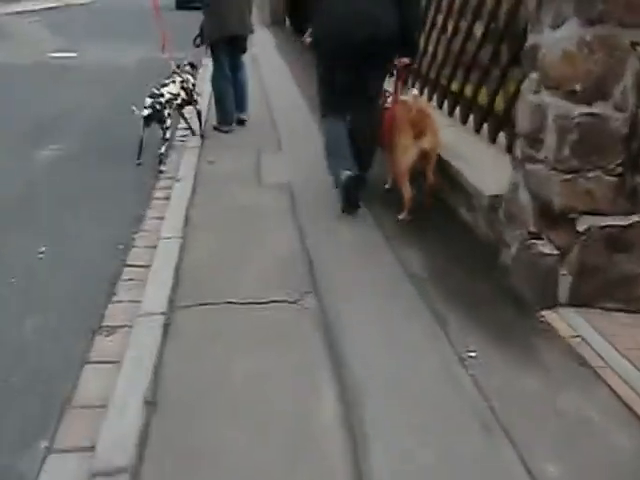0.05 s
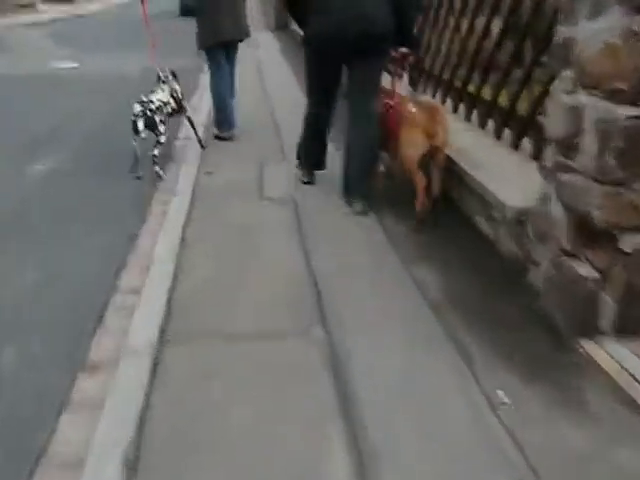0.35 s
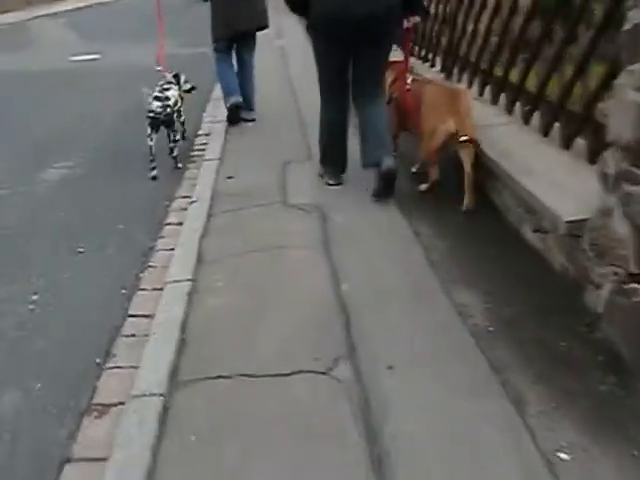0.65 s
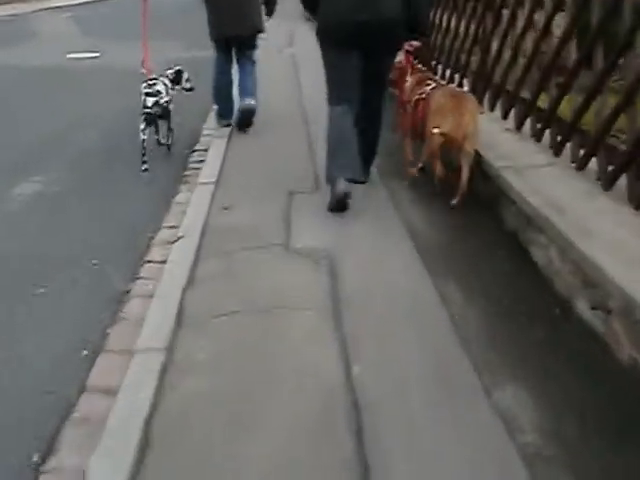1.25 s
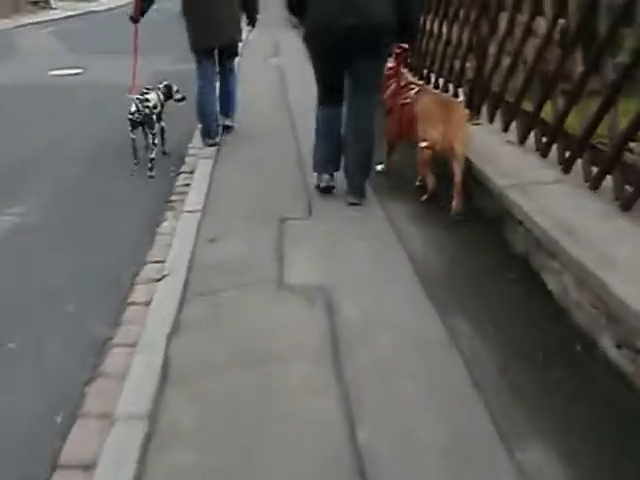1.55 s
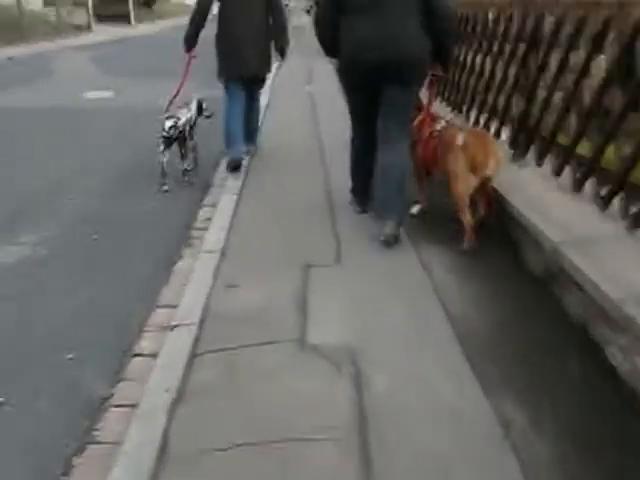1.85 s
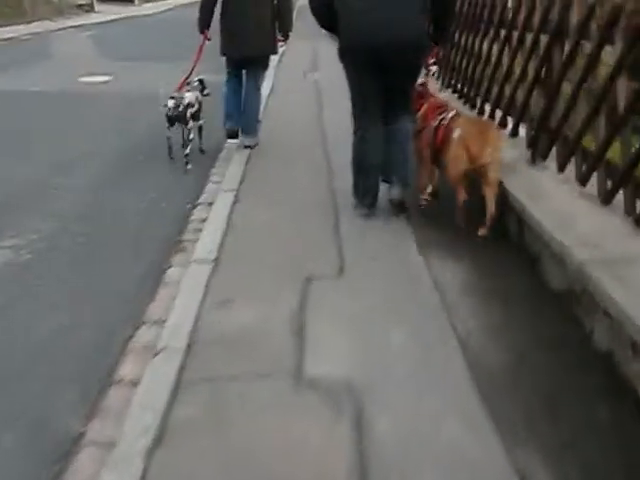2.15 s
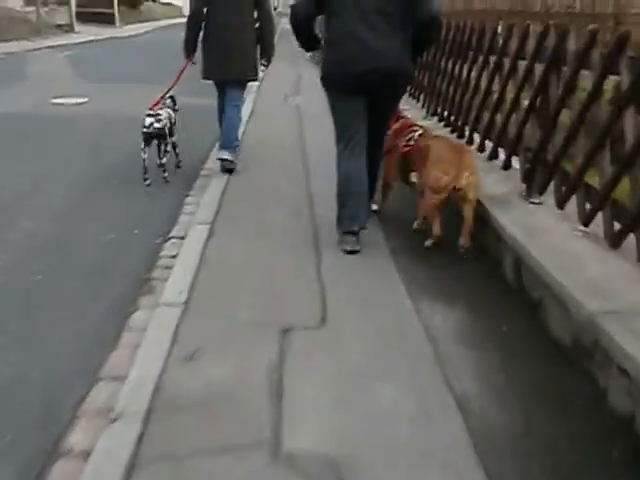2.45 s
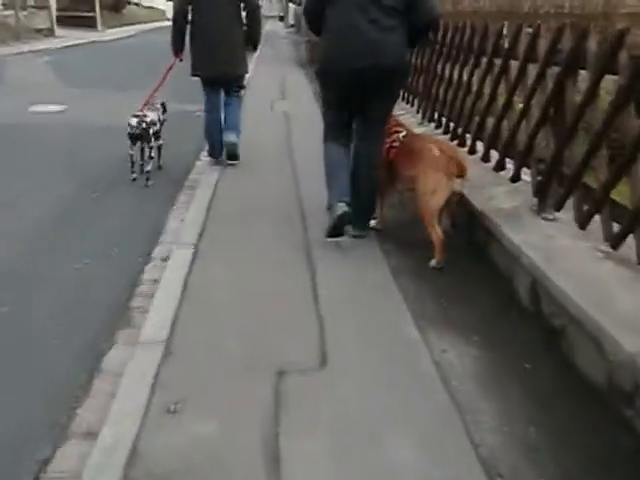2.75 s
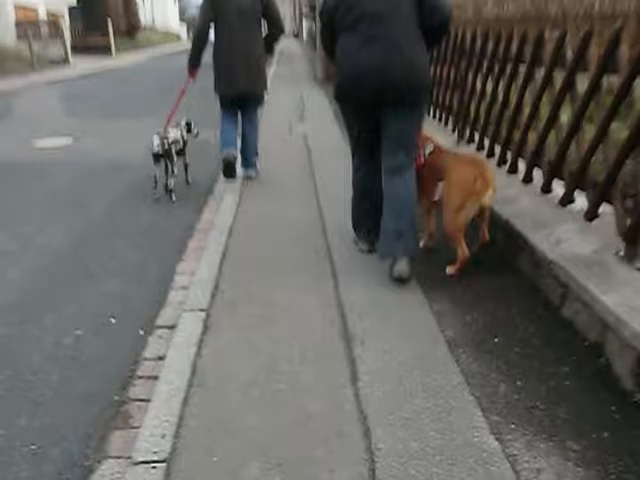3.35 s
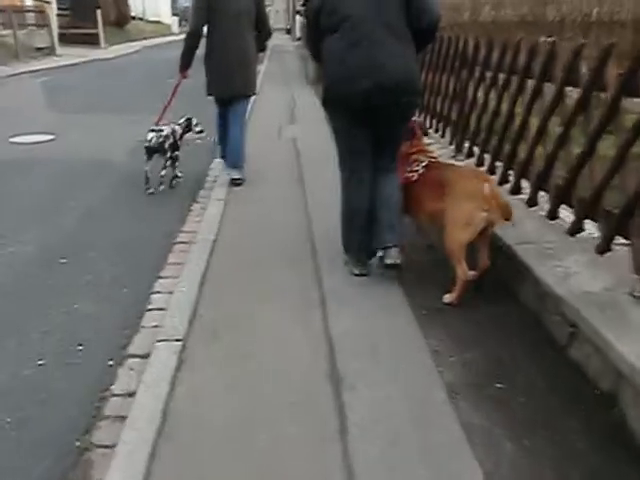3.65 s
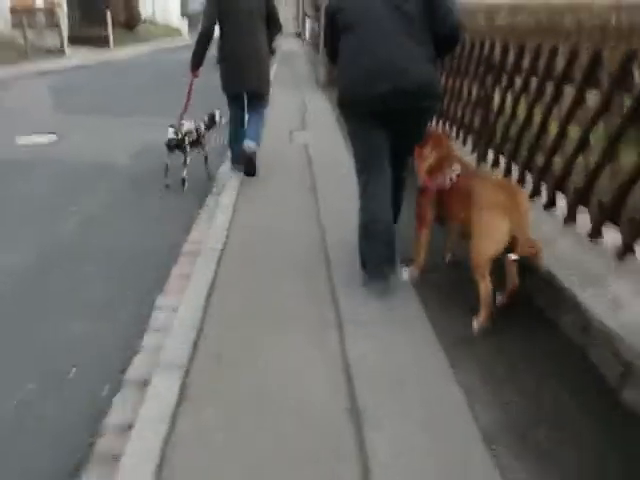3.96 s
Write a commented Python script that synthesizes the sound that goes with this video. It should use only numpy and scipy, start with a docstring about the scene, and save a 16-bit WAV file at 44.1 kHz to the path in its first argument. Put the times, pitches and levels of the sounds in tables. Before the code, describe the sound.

A dog-training clicker gives two sharp, close clicks in quick succession a little past halfway. Wind buffets the microphone before and after, while faint shoe scuffs, claw ticks and tag clinks sound over a soft street hiss.

```python
"""A dog-training clicker is pressed and let go close by, on a walk with dogs along a paved street.
Its steel tongue snaps over and back, each time with a crack and a short ring in a small plastic box.
Gusts buffet the microphone with little swirls of air. Shoes scuff, clothes swish, grit and claws tick
on the pavement and the dogs' tags clink, all over a faint street hiss."""
import sys
import numpy as np
from scipy import signal
from scipy.fft import rfft, irfft
from scipy.io import wavfile

SR = 44100
rng = np.random.default_rng(int(sys.argv[2]) if len(sys.argv) > 2 else 0)


def log_audio(samples):
    """Write samples as a 16-bit WAV file to the path given in sys.argv[1]."""
    # one column per channel
    frames = np.atleast_2d(samples).T
    # limit to full scale, then quantise
    limited = np.clip(frames, -1, 1)
    pcm = np.round(limited * 32767).astype(np.int16)
    wavfile.write(sys.argv[1], SR, pcm)


N = 176400
T = np.arange(N) / SR


def from_db(db):
    """Turn decibels into a number to multiply a sound by."""
    return 10 ** (np.asarray(db) / 20)


def noise(colour, size=N):
    """Noise of standard strength (rms 1); colour(Hz) says how strong each frequency is."""
    hz = np.maximum(np.fft.rfftfreq(size, 1 / SR), 1)
    x = irfft(rfft(rng.standard_normal(size)) * colour(hz), size)
    return x / np.std(x)


def through(points):
    """A noise colour that joins up points of frequency in Hz and level in dB."""
    at, db = np.transpose(points)
    return lambda hz: from_db(np.interp(np.log(hz), np.log(at), db))


def hump(centre_hz, octaves):
    """A noise colour with one peak; more octaves make it wider."""
    return lambda hz: (1 + .5 * (np.log2(hz / centre_hz) / octaves) ** 2) ** -2


def dying(fade_s):
    """Half a second of fading, down 60 dB every fade_s seconds."""
    return from_db(-60 * T[:SR // 2] / fade_s)


def swell(rise, fall):
    """One second with a bell-shaped peak in the middle."""
    t = T[:SR] - .5
    return np.exp(-.5 * (t / np.where(t < 0, rise, fall)) ** 2)


def add(out, start, x):
    """Mix x into out at a start time in seconds."""
    i = int(round(start * SR))
    x, i = x[max(-i, 0):], max(i, 0)
    out[i:i + len(x)] += x[:N - i]


def gust(peak_s, half_s, rate, count=25):
    """A run of swirls, each a lopsided bump of pressure; faster air makes them closer and sharper."""
    out, t = np.zeros(N), T[:SR // 10] - 1 / 20
    spacing_s, usual_width_s = 1.05 / rate, 0.21 / rate
    jitter, steepness, spread_db, spread_octaves = 0.2943, 1.93, 3, 0.44
    lead_db, lead_sharper = 1.5, 1.179
    places = np.arange(count) - count // 2
    for k, (late, size, sharp, skew) in zip(places, rng.standard_normal((count, 4))):
        lead = k == 0   # the swirl at the height of the gust
        offset = 0 if lead else (k + jitter * late) * spacing_s
        width = usual_width_s / (lead_sharper if lead else 2 ** (spread_octaves * sharp))
        gain = from_db(lead_db if lead else spread_db * (size - .5))
        gain *= np.exp(-.5 * (offset / half_s) ** 2)
        if gain > .02:
            spike = (1 - 1j * t / width) ** -steepness
            bump = np.real(np.exp(2j * skew) * spike) * np.hanning(len(t))   # skew tips it to one side
            even_out = np.sqrt(SR / rate / np.sum(bump ** 2))   # same energy whatever the width
            add(out, peak_s + offset + t[0], gain * bump * even_out)
    return out


def wind():
    """Gusts buffet the microphone over a low, swaying breeze; the hardest ones crackle."""
    # Each row: peak time in seconds, half length in seconds, relative level in dB, rough swirls a second.
    gusts = [(0.009, 0.0063, -8, 87), (0.023, 0.0047, -5, 157), (0.042, 0.012, -11, 178),
             (0.056, 0.042, -20.5, 78), (0.108, 0.0083, -10.5, 142), (0.139, 0.0048, -17, 187),
             (0.15, 0.015, -16, 147), (0.171, 0.0034, -8.5, 202), (0.199, 0.0073, -16.5, 193),
             (0.237, 0.038, -19.5, 98), (0.424, 0.013, -21.5, 125), (0.478, 0.0094, -17, 125),
             (0.521, 0.0053, -14.5, 138), (0.544, 0.038, -21, 145), (0.574, 0.0087, -15, 169),
             (0.606, 0.01, -12, 123), (0.629, 0.011, -15, 218), (0.648, 0.012, -18, 166),
             (0.666, 0.01, -16, 173), (0.689, 0.021, -18, 101), (0.767, 0.019, -22, 70),
             (0.827, 0.018, -18.5, 75.6), (0.882, 0.025, -19.5, 92.7), (1.033, 0.0061, -19, 48),
             (1.341, 0.046, -32.5, 50), (1.417, 0.011, -22.5, 75.5), (1.463, 0.018, -30, 43),
             (1.553, 0.009, -27.5, 55), (1.701, 0.014, -21.5, 134), (1.719, 0.023, -17, 96),
             (1.776, 0.0085, -19.5, 64), (1.827, 0.048, -23.5, 56), (1.905, 0.009, -20.5, 56),
             (1.987, 0.012, -18.5, 124), (2.069, 0.063, -27.5, 55), (2.212, 0.01, -19.5, 98),
             (2.267, 0.014, -21, 112), (2.308, 0.024, -21.5, 82.6), (2.642, 0.05, -35.5, 50),
             (2.875, 0.035, -27.5, 64), (2.986, 0.016, -10.5, 76.4), (3.091, 0.011, -13.5, 87),
             (3.107, 0.0094, -12.5, 153), (3.142, 0.014, -12, 69), (3.17, 0.009, -12.5, 130),
             (3.185, 0.012, -12, 80), (3.216, 0.0057, -9.5, 125), (3.287, 0.073, -25, 70.6),
             (3.368, 0.0034, -24, 96), (3.482, 0.043, -17.5, 68.6), (3.506, 0.021, -12, 115),
             (3.545, 0.014, -19, 83), (3.939, 0.011, -7.5, 52), (3.963, 0.02, -16.5, 158)]
    # Each row: frequency in Hz, relative level of the breeze there in dB.
    breeze_colour = [(28, -22), (39, 0), (120, -3.5), (240, -17), (450, -26), (900, -49)]
    # Each row: peak time in seconds, length in seconds, level in dB.
    crackles = [(0.019, 0.025, -39), (0.035, 0.0015, -29.5), (.042, 0.0022, -32), (.17, 0.002, -38.5),
                (.63, 0.0076, -36.5), (0.649, 0.0092, -43.5), (3.171, 0.0019, -34)]
    # Each row: frequency in Hz, relative level of a crackle there in dB.
    crackle_colour = [(800, 2.5), (2000, -2), (4000, -4.5), (7000, -11), (15000, -25)]
    gust_db, lowest_hz, breeze_db, sway_db = -0.81, 32.3, -42, 3
    buffets = sum(from_db(db + gust_db) * gust(peak_s, half_s, rate) for peak_s, half_s, db, rate in gusts)
    out = signal.sosfilt(signal.butter(6, lowest_hz, "high", fs=SR, output="sos"), buffets)
    sway = noise(lambda hz: np.exp(-hz / 10))
    out += from_db(breeze_db + sway_db * sway) * noise(through(breeze_colour))
    for peak_s, length, db in crackles:
        loudness = from_db(db) * swell(length / 2, length / 2)
        add(out, peak_s - .5, loudness * noise(through(crackle_colour), size=SR))
    return out


def street():
    """The street gives a smooth hiss that slowly grows."""
    # Each row: time in seconds, level in dB.
    levels = [(0, -55.5), (.7, -56.5), (1.2, -55.5), (1.7, -53.5), (2.2, -51), (2.7, -47.5), (3.2, -48),
              (3.65, -49), (4, -48)]
    # Each row: frequency in Hz, relative level of the hiss there in dB.
    colour = [(200, -5.5), (600, 7), (1200, 2), (2500, -1), (6000, -5.5), (10000, -11.5), (13000, -11),
              (16000, -35.5)]
    return from_db(np.interp(T, *np.transpose(levels))) * noise(through(colour))


def taps(rows, gain_db, fade_s, octaves):
    """Small hard things knock together: each hit is a burst of noise that fades fast."""
    out = np.zeros(N)
    for start, db, hz in rows:
        burst = dying(fade_s) * noise(hump(hz, octaves), size=SR // 2)
        add(out, start, from_db(db + gain_db) * burst)
    return out


def grit_and_claws():
    """Grit and claws strike the pavement in dry ticks with no clear pitch."""
    # Each row: start in seconds, relative level in dB, centre frequency in Hz.
    ticks = [(0.561, -37.5, 6640), (0.587, -39, 7340), (.807, -40, 6400), (.964, -38.5, 7340),
             (1.221, -39.5, 5500), (1.351, -37, 5000), (1.357, -31, 4970), (1.378, -38, 7000),
             (1.801, -31.5, 6500), (1.819, -40, 7500), (1.965, -38, 6000), (2.129, -39, 7000),
             (2.246, -29, 6750), (2.691, -25, 5860), (3.201, -31, 6400), (3.358, -32.5, 6000),
             (3.519, -35.5, 7400), (3.561, -30.5, 6740), (3.876, -34.5, 7000)]
    return taps(ticks, gain_db=-8.5, fade_s=0.03, octaves=0.67)


def dog_tags():
    """The tags knock together and ring briefly around one high pitch."""
    # Each row: start in seconds, relative level in dB, pitch in Hz.
    clinks = [(.81, -57, 14000), (1.599, -46.5, 11000), (1.6, -50, 12900), (2.23, -36, 6250),
              (2.386, -43, 5060), (3.545, -37, 6260)]
    return taps(clinks, gain_db=-4, fade_s=0.058, octaves=0.074)


def shoes_and_clothes():
    """Soles scuff and cloth swishes: uneven rubbing makes soft swells of grainy noise."""
    # Each row: peak time, rise and fall in seconds, level in dB, centre in Hz, width in octaves.
    scuffs = [(1.35, .05, .025, -57.5, 6000, .8), (1.5, 0.052, 0.054, -55.5, 1860, 1.04),
              (1.9, 0.061, 0.072, -54, 5100, 0.85), (2.14, 0.017, 0.017, -56.5, 3500, 0.48),
              (2.665, 0.01, 0.014, -43.5, 3200, 1.04), (2.984, 0.014, 0.024, -48.5, 2950, 1.3),
              (3.046, 0.0073, 0.059, -43, 5200, 0.93), (3.08, 0.052, .04, -48.5, 1710, .7),
              (3.485, 0.075, .045, -43, 3700, 0.63), (3.56, 0.01, 0.016, -47.5, 6200, .25),
              (3.755, 0.013, 0.014, -47.5, 2960, 0.86), (3.915, 0.028, .08, -51, 2200, 0.84)]
    grain_db, grain_hz = 2.4, 150
    out = np.zeros(N)
    for peak_s, rise, fall, db, hz, octaves in scuffs:
        grain = from_db(grain_db * noise(lambda f: np.exp(-f / grain_hz), size=SR))
        rubbing = grain * noise(hump(hz, octaves), size=SR)
        add(out, peak_s - .5, from_db(db) * swell(rise, fall) * rubbing)
    return out


def clicker():
    """The steel tongue cracks and rings in a box too small for bass; the street echoes it faintly."""
    # Each snap: start in seconds, then relative levels in dB of the snap, its crack and its echo.
    press = (2.3371, -8.5, -10.5, -41.5)
    release = (2.4997, -6.5, -6.5, -36)
    # The tongue's tones, bent and at rest. Each row: pitch in Hz, relative level in dB, fade in seconds.
    bent_tones = [(1605, -7, 0.016), (1860, -9.5, .02), (2410, -11, .016), (2550, 0.5, 0.025),
                  (4100, -4, 0.016), (4270, -4.5, 0.024), (4316, -1.5, .026), (4400, -37, 0.28),
                  (5290, -13, .03), (7110, -15, 0.041), (7520, -4.5, 0.025), (8430, -10, 0.019),
                  (8830, -16, .022), (9760, -6, 0.032), (10450, -19, .032), (11000, -24, 0.079),
                  (11900, -20, .028), (12650, -17, 0.031), (14500, -22, .025)]
    rest_tones = [(1768, -2, 0.018), (2487, 0.5, 0.018), (3500, -18.5, 0.091), (4260, -9, 0.028),
                  (4530, -5.5, 0.022), (5325, -12.5, 0.03), (5580, -13, .036), (6520, -11, 0.024),
                  (6977, -23, 0.04), (7360, -7, 0.026), (7660, -6, .025), (9110, -12, 0.022),
                  (9700, -10, 0.024), (10170, -11, 0.024), (11200, -19, 0.031), (12500, -26, 0.065)]
    # Each row: frequency in Hz, relative level of the crack or the echo there in dB.
    crack_colour = [(900, -10), (1300, -19), (1600, 0), (5000, -4.5), (10000, -6.5), (12500, -25),
                    (15500, -21)]
    echo_colour = [(900, -23), (1700, 2), (4500, -2.5), (8000, -3), (15000, -14)]
    build_s, crack_fade_s, echo_fade_s, box_low_hz = 0.0011, .036, .27, 990
    out, t = np.zeros(N), T[:SR // 2]
    build_up = 1 - np.exp(-t / build_s)   # the box takes up the vibration
    for (start, db, crack_db, echo_db), tones in ((press, bent_tones), (release, rest_tones)):
        ring = sum(from_db(level) * dying(fade_s) * np.sin(2 * np.pi * (hz * t + rng.random()))
                   for hz, level, fade_s in tones)
        crack = from_db(crack_db) * dying(crack_fade_s) * noise(through(crack_colour), size=len(t))
        echo = from_db(echo_db) * dying(echo_fade_s) * noise(through(echo_colour), size=len(t))
        add(out, start, build_up * (from_db(db) * (ring + crack) + echo))
    return signal.sosfilt(signal.butter(2, box_low_hz, "high", fs=SR, output="sos"), out)


def scene():
    """All the sounds meet at one microphone."""
    return (clicker() + wind() + shoes_and_clothes() + grit_and_claws() + dog_tags() + street())[None]


def record(dry):
    """Round off the loudest peaks and cut the very highest treble."""
    ceiling, cutoff_hz = .9, 16000
    rounded = dry / (1 + (dry / ceiling) ** 8) ** (1 / 8)
    return signal.sosfilt(signal.ellip(10, .2, 80, cutoff_hz, fs=SR, output="sos"), rounded)


dry = scene()
out = record(dry)
log_audio(out)
```